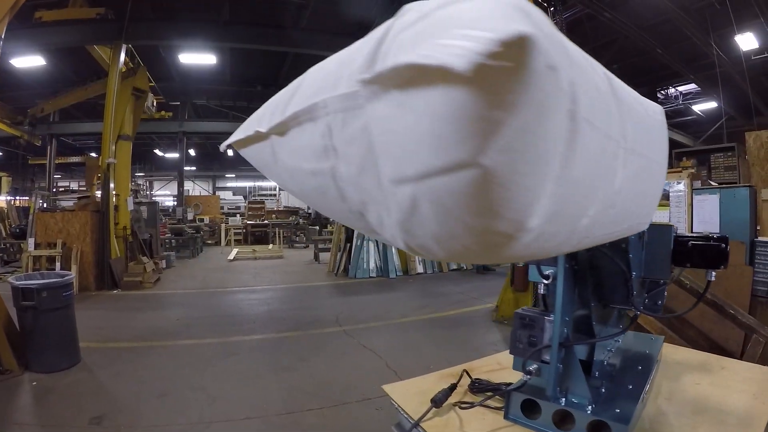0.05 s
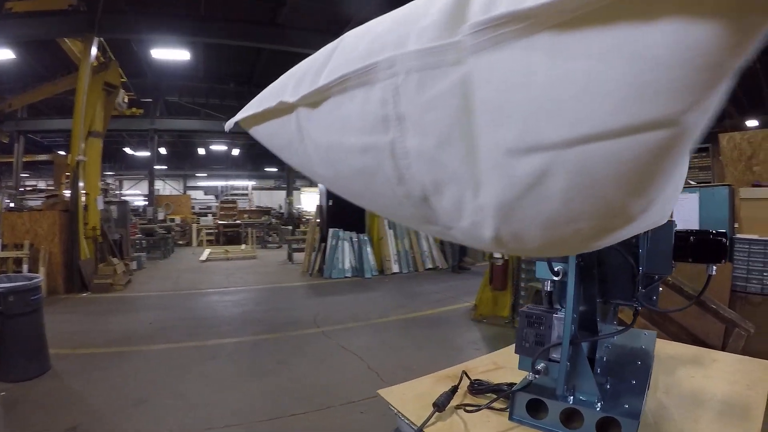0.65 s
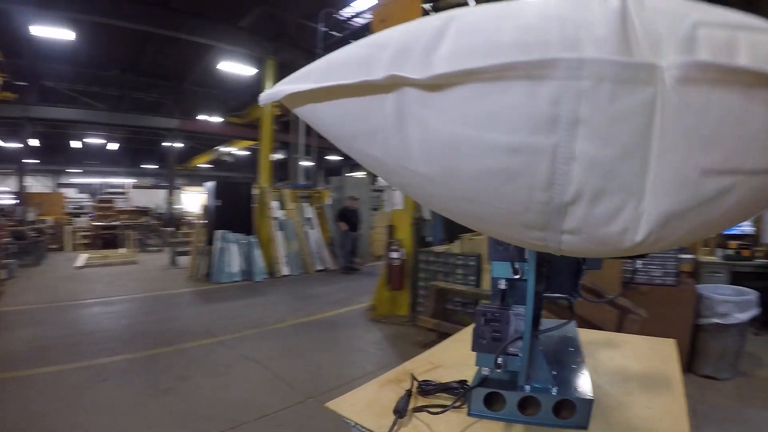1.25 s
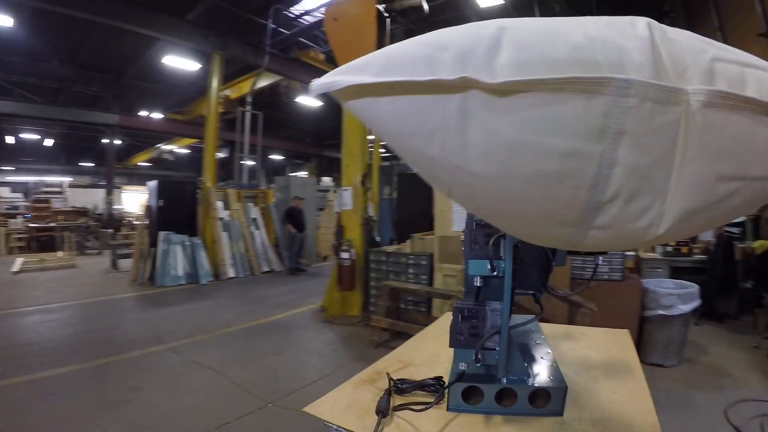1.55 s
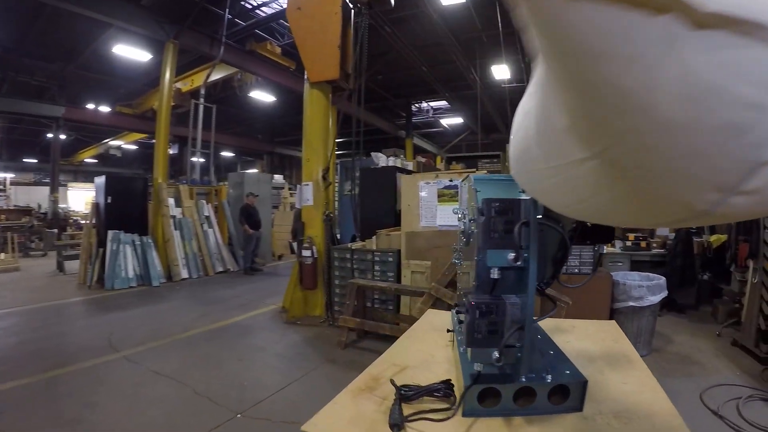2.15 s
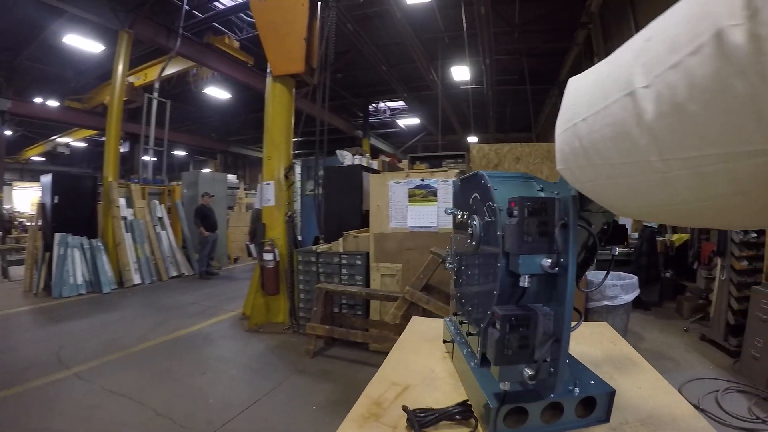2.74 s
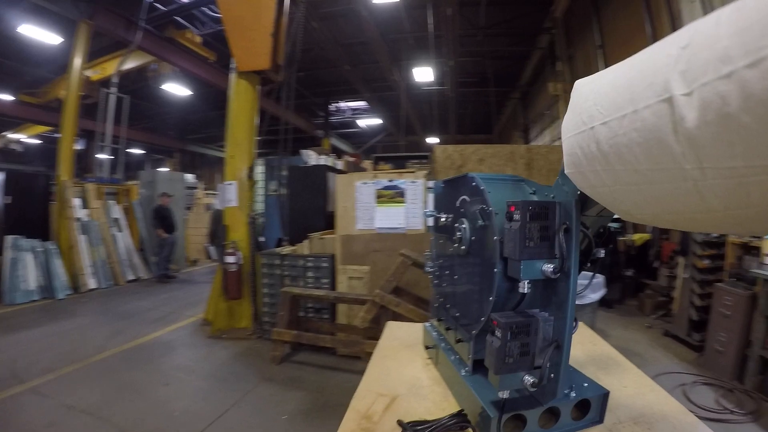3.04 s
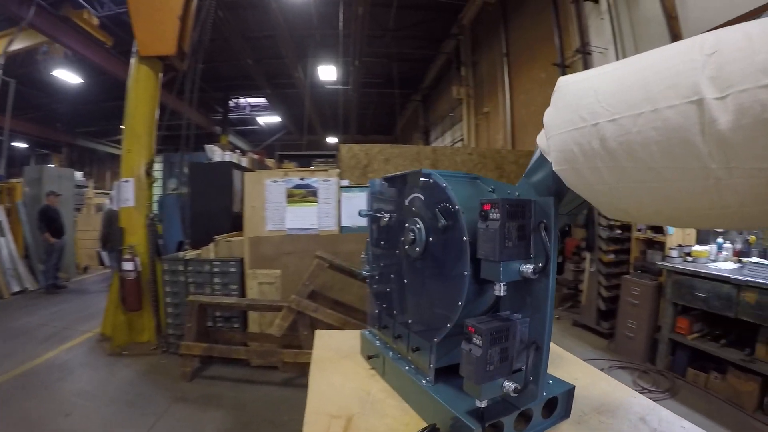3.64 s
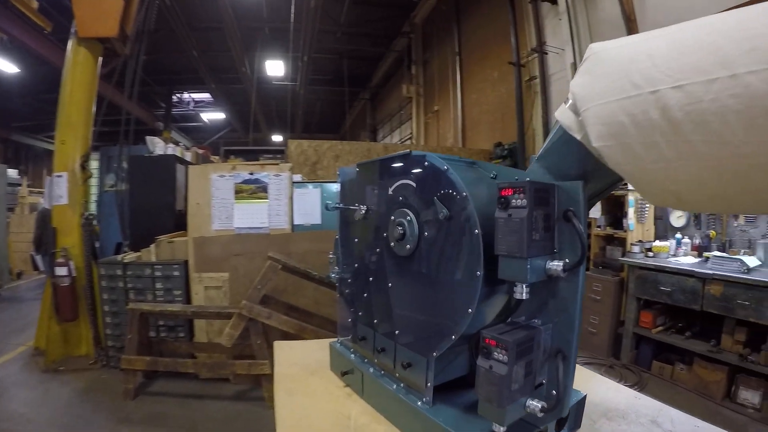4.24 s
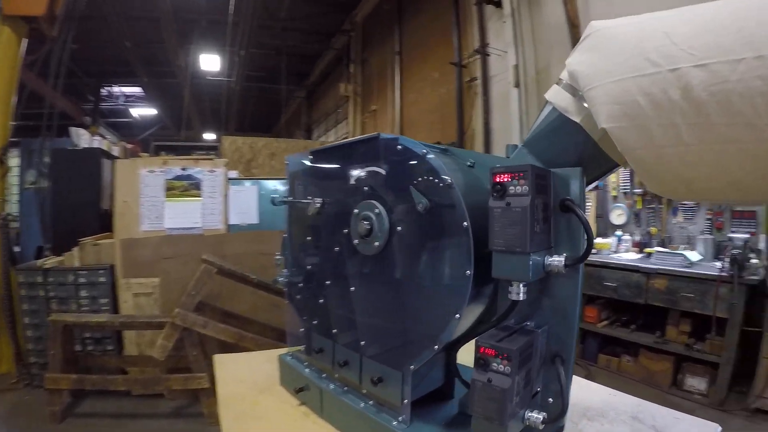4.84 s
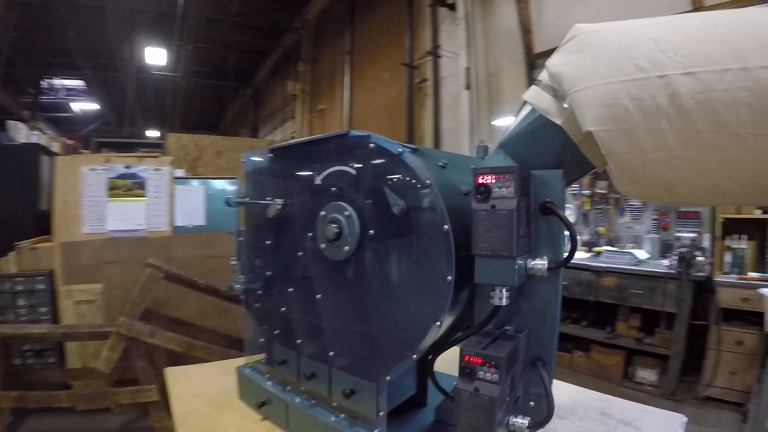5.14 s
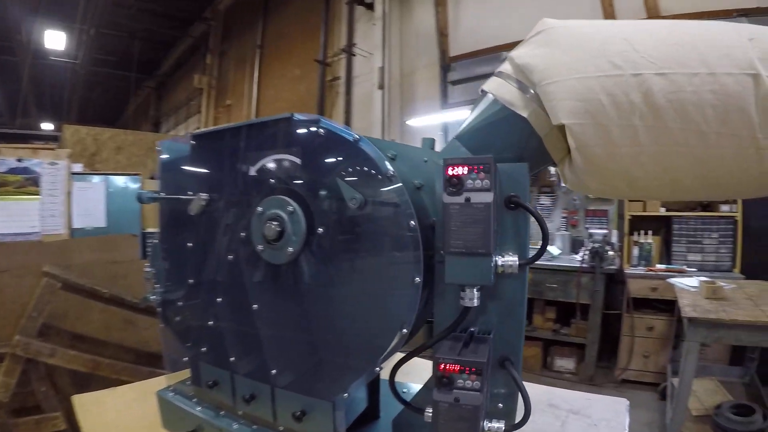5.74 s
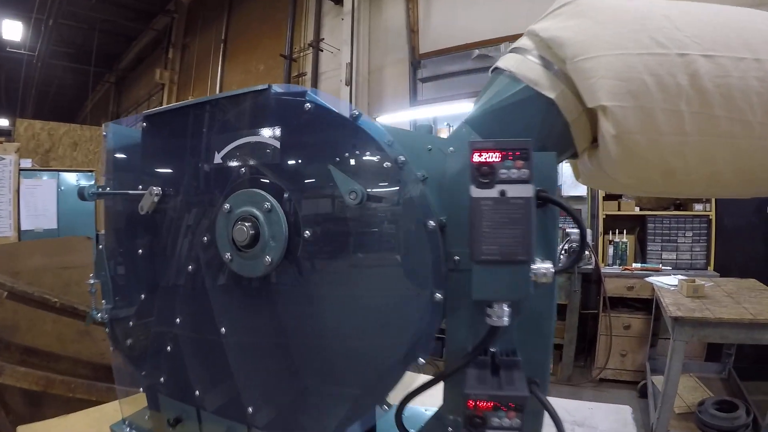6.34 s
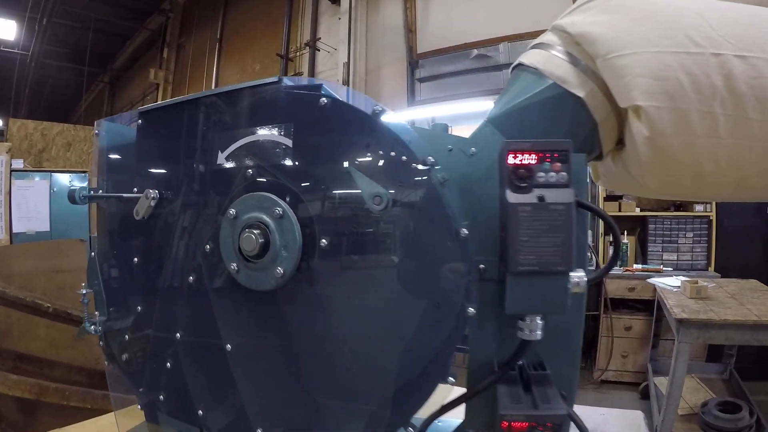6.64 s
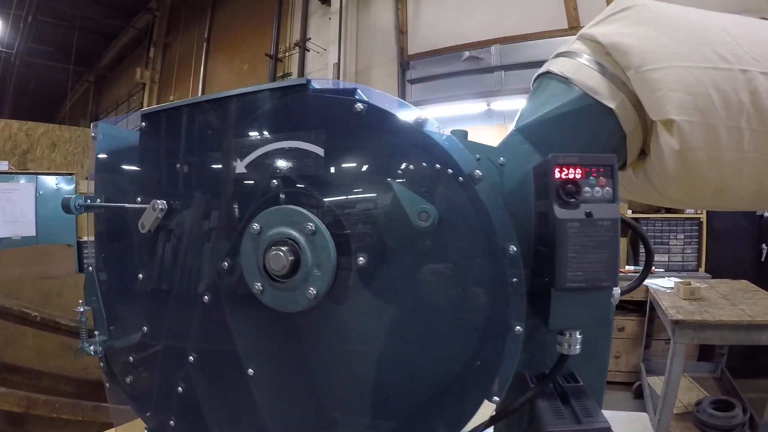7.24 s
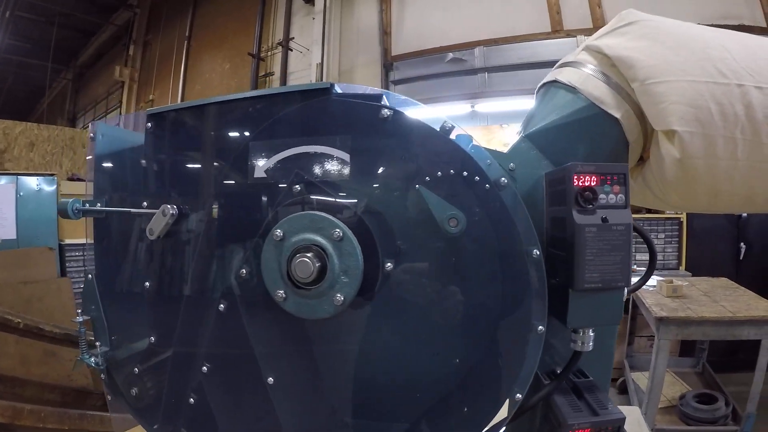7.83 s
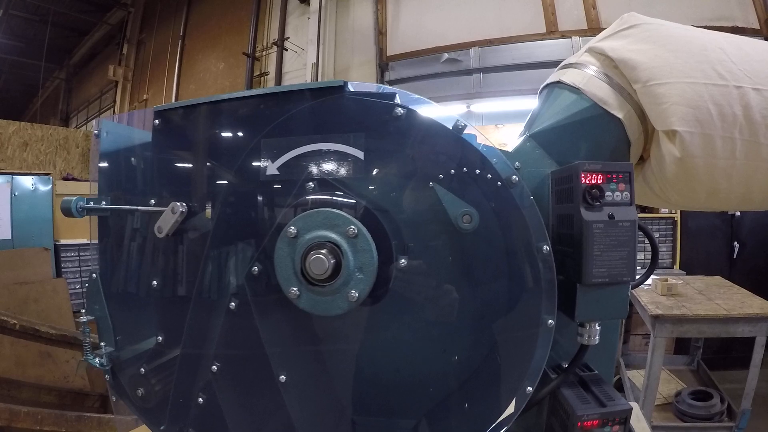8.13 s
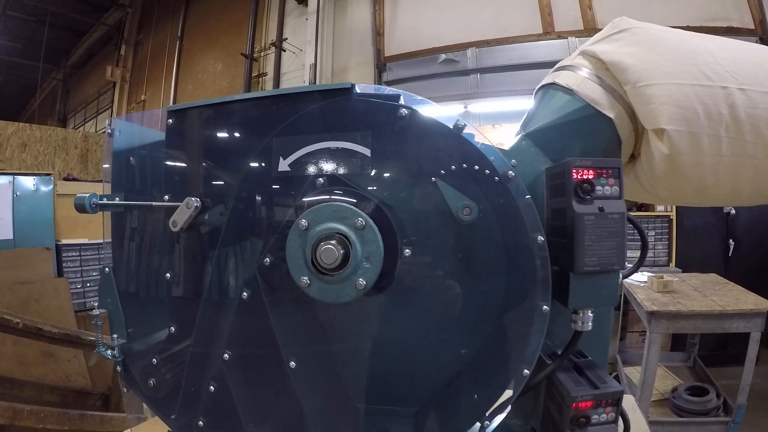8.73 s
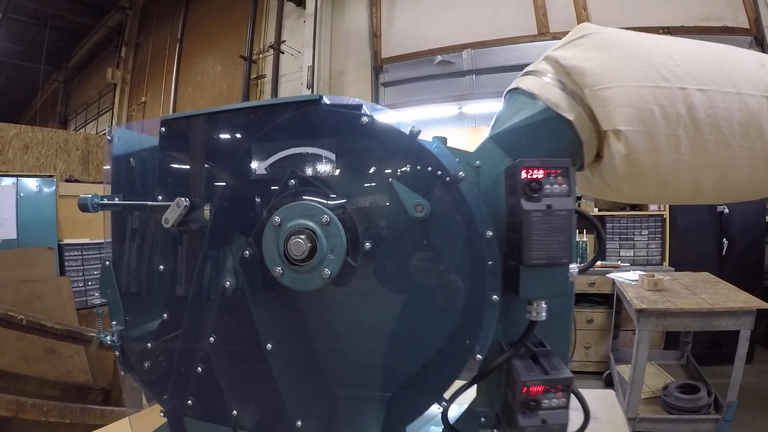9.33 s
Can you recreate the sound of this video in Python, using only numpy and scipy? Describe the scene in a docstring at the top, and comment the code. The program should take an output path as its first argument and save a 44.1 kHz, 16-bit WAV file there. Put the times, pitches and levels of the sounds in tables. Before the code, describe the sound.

Deep rumbling air and the even drone of a motor-driven blower fill a large workshop throughout, topped by a thin whine and a soft hiss through a cloth bag. The hum strengthens as the microphone walks round to the front of the machine. Behind it, compressed air spurts three times about a second apart, then twice in quick succession, each short burst ringing in the hall.

```python
"""A big workshop: a grain aspirator runs steadily, blowing into a cloth filter bag, while the
microphone walks from the bag round to the rotor cover. The rotor drones on its shaft orders, the
motor hums and whines, and air rumbles in the fan, rings the duct and casing and hisses out through
the cloth. Five blasts of compressed air, the last two close together, ring further down the hall."""
import sys
import numpy as np
from scipy import signal
from scipy.fft import rfft, irfft, next_fast_len
from scipy.io import wavfile
from scipy.ndimage import map_coordinates

SR = 44100
rng = np.random.default_rng(int(sys.argv[2]) if len(sys.argv) > 2 else 0)


def unload_wav(signal):
    """Save mono or channel-first audio to the path in sys.argv[1] as 16-bit WAV at rate SR, clipped to [-1, 1]."""
    wavfile.write(
        sys.argv[1],
        SR,
        np.round(np.clip(np.atleast_2d(signal).T, -1, 1) * 32767).astype(np.int16),
    )


N = 418068
TIME = np.arange(N) / SR
SHAFT_HZ, HUM_HZ = 29.714, 120


def undb(db):
    """Decibels to gain."""
    return 10 ** (np.asarray(db) / 20)


def curve(table):
    """Rows of (seconds, value), interpolated to every sample."""
    return np.interp(TIME, *np.transpose(table))


def along(near, bag_db, cover_db):
    """Level in dB between the bag (near = 0) and the rotor cover (near = 1)."""
    return bag_db + (cover_db - bag_db) * near


def wander(rate_hz):
    """Smooth random drift, spread about 1."""
    knots = rng.standard_normal(2048)
    coarse_s = np.arange(0, N + 64, 64) / SR
    drift = map_coordinates(knots, [coarse_s * rate_hz], order=3, mode="wrap")
    return np.interp(TIME, coarse_s, drift)


def turbulence(spectrum):
    """Noise shaped by rows of (Hz, relative dB), rms 1."""
    size = next_fast_len(N)
    hz, db = np.transpose(spectrum)
    log_hz = np.log(np.maximum(np.fft.rfftfreq(size, 1 / SR), 1))
    gain = undb(np.interp(log_hz, np.log(hz), db, left=-120, right=-120))
    noise = irfft(rfft(rng.standard_normal(size)) * gain, size)[:N]
    return noise / np.std(noise)


def tone(cycles, rms_db, fade_db, fade_hz):
    """A sine that swells and fades as the microphone sways."""
    return np.sqrt(2) * undb(rms_db + fade_db * wander(fade_hz)) * np.sin(2 * np.pi * cycles)


def rotor_cycles(turns, order):
    """Phase of a shaft order: odd ones lag a quarter cycle, and the housing delays high ones more."""
    lag = order % 2 / 4 + 0.016 * order ** 2
    return order * turns - lag


# Rotor tones. Each row: multiple of the shaft rate, level in dB at the bag, level in dB at the cover.
ROTOR_ORDERS = [(1, -40, -28.5), (2, -26.5, -30), (3, -31, -19), (4, -28, -38), (5, -38.5, -23.5),
                (6, -30.5, -17), (7, -27, -22), (8, -28, -64), (9, -38.5, -26), (10, -49, -49),
                (11, -47.5, -38.5), (12, -44, -44), (13, -49, -49.5), (14, -51.5, -49.5), (15, -50.5, -44),
                (16, -37.5, -47.5), (17, -56.5, -47), (21, -61, -54.5), (24, -56, -53), (25, -53, -59)]
def rotor_drone(turns, near):
    """The housing shakes at multiples of the shaft rate, out of step, so the drone does not thump."""
    drone = 0
    for order, bag_db, cover_db in ROTOR_ORDERS:
        level_db = along(near, bag_db, cover_db)
        drone += tone(rotor_cycles(turns, round(order)), level_db, fade_db=1.0, fade_hz=2.887)
    return drone


def motor_hum(turns, near, beat_dip_s=8.0):
    """The iron hums at twice the mains rate and beats slowly with the fourth rotor order."""
    slip_cycles = HUM_HZ * TIME - rotor_cycles(turns, 4)
    antiphase = 0.5 - np.interp(beat_dip_s, TIME, slip_cycles)
    level_db = along(near, bag_db=-32, cover_db=-25)
    return tone(HUM_HZ * TIME + antiphase, level_db, fade_db=5.0, fade_hz=1.53)


# Whine tones before beam gain. Each row: frequency in Hz, level in dB at the bag, in dB at the cover.
WHINE_TONES = [(1186.3, -50.3, -48.7), (1216.4, -60, -60.5), (1275.4, -60, -50.5), (1305, -57.5, -59),
               (1334.8, -64, -60), (1693.6, -63, -59), (2000.5, -57, -50), (2044.2, -69, -62),
               (2162, -71, -59), (2308.2, -64, -62), (2346.3, -66, -67), (3026.3, -68, -71),
               (5400.4, -72, -67), (5997, -70, -67)]
# Motor beam along the walk. Each row: time in seconds, gain in dB.
WHINE_BEAM_DB = [(0, -7.5), (1.7, 4.5), (3.7, -5.5), (4.4, -4), (6.2, 1), (7.3, 0), (8.6, -4), (9.48, -1)]
def motor_whine(turns, near):
    """Slots and bearings whine with the shaft; the motor beams this to the side and front."""
    beam_db = curve(WHINE_BEAM_DB)
    whine = 0
    for hz, bag_db, cover_db in WHINE_TONES:
        cycles = hz * turns / SHAFT_HZ + rng.random()
        whine += tone(cycles, along(near, bag_db, cover_db) + beam_db, fade_db=1.4, fade_hz=2.56)
    return whine


# Fan eddy spectrum. Each row: frequency in Hz, relative density in dB.
RUMBLE_SPECTRUM = [(8, -8), (24, -0.5), (40, -0.5), (60, -2), (110, 0.5), (190, -1.5), (250, -4),
                   (330, -11), (400, -15), (480, -21.5), (550, -31.5), (700, -55)]
def fan_rumble(near):
    """Eddies rumble in the fan."""
    level_db = along(near, bag_db=-18, cover_db=-19) + 0.15 * wander(8.2)
    return undb(level_db) * turbulence(RUMBLE_SPECTRUM)


# Duct resonances. Each row: frequency in Hz, relative density in dB.
DUCT_SPECTRUM = [(480, -23), (570, -12), (630, 1.5), (680, -2), (740, 4), (850, -1.5), (910, -3), (970, -5),
                 (1060, -10.5), (1130, -16.5), (1300, -46)]
def duct_ring(near, base_db=-42, mouth_reach=0.16):
    """Eddies ring the duct, loudest beside its mouth at the bag."""
    mouth_db = 3.5 * np.exp(-(near / mouth_reach) ** 2)
    return undb(base_db + mouth_db + 0.5 * wander(22)) * turbulence(DUCT_SPECTRUM)


# Casing resonances. Each row: frequency in Hz, relative density in dB.
CASING_SPECTRUM = [(1080, -32), (1150, -9), (1210, -2.5), (1380, 2.5), (1600, 2), (1830, 0), (2030, 1),
                   (2250, -4.5), (2600, -8.5), (3400, -26)]
def casing_ring(turns, near):
    """Eddies ring the casing, pulsing a little with each turn."""
    pulse_db = 0.34 * np.cos(2 * np.pi * turns)
    level_db = along(near, bag_db=-42, cover_db=-41) + 0.38 * wander(24)
    return undb(level_db + pulse_db) * turbulence(CASING_SPECTRUM)


# Bag hiss spectrum. Each row: frequency in Hz, relative density in dB.
CLOTH_SPECTRUM = [(1300, -28), (2500, -11), (3000, -5), (3900, -3.5), (4500, -4), (5600, -1), (6400, 0),
                  (7400, -5.5), (8900, -6), (10000, -11), (11300, -20.5), (13800, -24), (15000, -33)]
# Bag hiss along the walk. Each row: time in seconds, level in dB.
CLOTH_LEVEL_DB = [(.25, -42.3), (.4, -40), (1.4, -41.5), (5.3, -41.9), (6.2, -41), (7.9, -42.5),
                  (9.48, -41.5)]
def cloth_hiss(turns):
    """Air hisses out through the bag, pulsing a little with each turn."""
    pulse_db = 0.36 * np.cos(2 * np.pi * turns)
    level_db = curve(CLOTH_LEVEL_DB) + 0.29 * wander(11)
    return undb(level_db + pulse_db) * turbulence(CLOTH_SPECTRUM)


# Air jet spectrum. Each row: frequency in Hz, relative density in dB.
JET_SPECTRUM = [(400, -15), (800, 3), (1100, -7.5), (1500, 8.5), (1850, 1), (2800, -2), (4200, -2),
                (5600, -1), (7000, -3.5), (9000, -12), (11000, -28), (15000, -39)]
# Valve openings. Each row: start in seconds, length in seconds, level in dB at the jet.
VALVE_OPENINGS = [(3.643, 0.045, -32), (4.48, 0.086, -33.5), (5.535, 0.066, -31.5), (6.972, 0.077, -24),
                  (7.127, 0.12, -29)]
def air_blasts(open_s=0.022, close_s=0.02):
    """A valve snaps open and shut; the jet's bright core arrives first, its body by way of the walls."""
    flow = 0
    for start_s, length_s, level_db in VALVE_OPENINGS:
        opening = np.clip((TIME - start_s) / open_s, 0, 1)
        closing = np.exp(-np.maximum(TIME - start_s - length_s, 0) / close_s)
        flow += undb(level_db) * opening * closing
    jet = flow * turbulence(JET_SPECTRUM)
    direct = signal.sosfilt(signal.butter(1, 2600, "high", fs=SR, output="sos"), jet)
    return undb(-2.5) * direct + undb(-3.0) * hall_echo(jet)


def hall_echo(source, delay_s=0.011, build_s=0.004, t60_low_s=2.9, t60_high_s=0.71):
    """Diffuse echo comes late from the walls; the air soaks up the treble first."""
    t = TIME[:2 * SR]
    spectrum = rfft(rng.standard_normal(len(t)))
    hz = np.fft.rfftfreq(len(t), 1 / SR)
    octave = np.log2(np.clip(hz, 1000, 8000) / 1000)
    tail = 0
    for k, t60_s in enumerate(np.geomspace(t60_low_s, t60_high_s, 4)):
        band = irfft(spectrum * np.maximum(1 - abs(octave - k), 0))
        tail += band * undb(-60 * t / t60_s)
    tail *= 1 - np.exp(-np.maximum(t - delay_s, 0) / build_s)
    return signal.fftconvolve(source, tail / np.sqrt(np.sum(tail ** 2)))[:N]


# Microphone path. Each row: time in seconds, nearness (0 under the bag, about 1 at the rotor cover).
MIC_WALK = [(0, 0.048), (2.3, 0.082), (3.7, 0.32), (4.6, 0.76), (7.4, 1.005), (9.48, 0.95)]
def scene():
    """The machine at nearly constant shaft speed, with the blasts behind it."""
    near = curve(MIC_WALK)
    turns = np.cumsum(SHAFT_HZ * (1 + 0.0004 * wander(2))) / SR
    tones = rotor_drone(turns, near) + motor_hum(turns, near) + motor_whine(turns, near)
    airflow = fan_rumble(near) + duct_ring(near) + casing_ring(turns, near) + cloth_hiss(turns)
    return (tones + airflow + air_blasts())[None]


def record(dry):
    """Soft peak limiting, then a steep low-pass."""
    ceiling, cutoff_hz = 0.85, 15050
    rounded = dry / (1 + (dry / ceiling) ** 8) ** (1 / 8)
    return signal.sosfilt(signal.ellip(10, 0.2, 80, cutoff_hz, fs=SR, output="sos"), rounded)


dry = scene()
out = record(dry)
unload_wav(out)
```